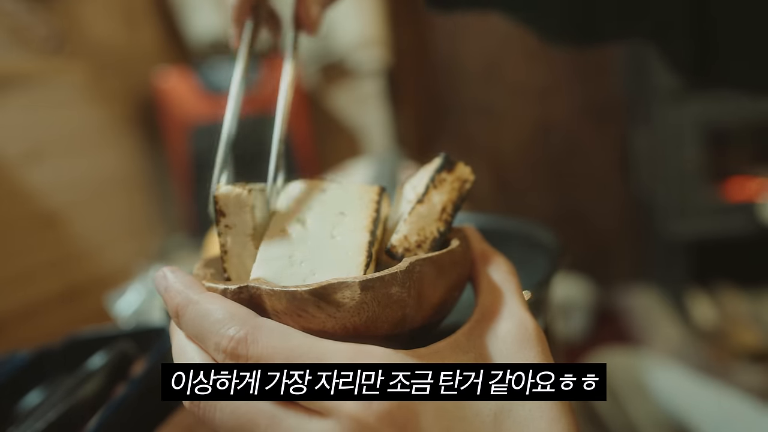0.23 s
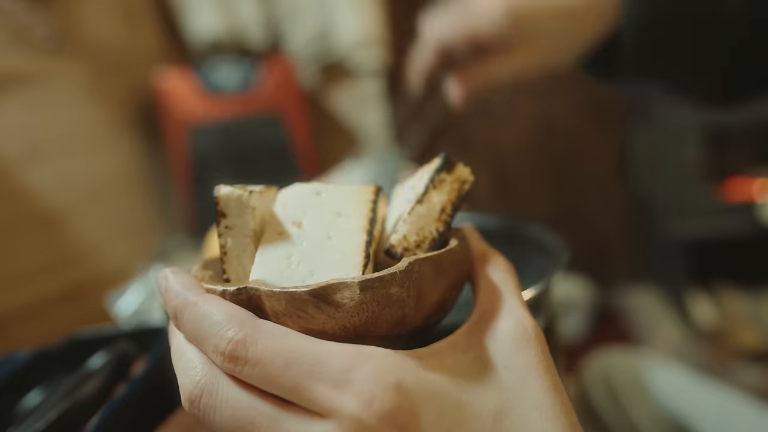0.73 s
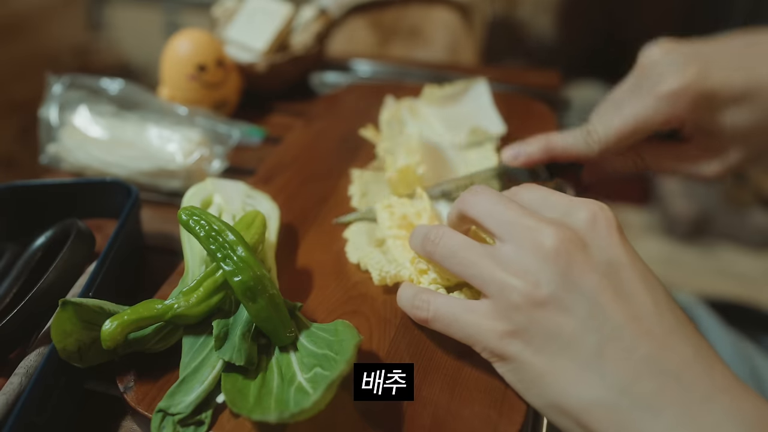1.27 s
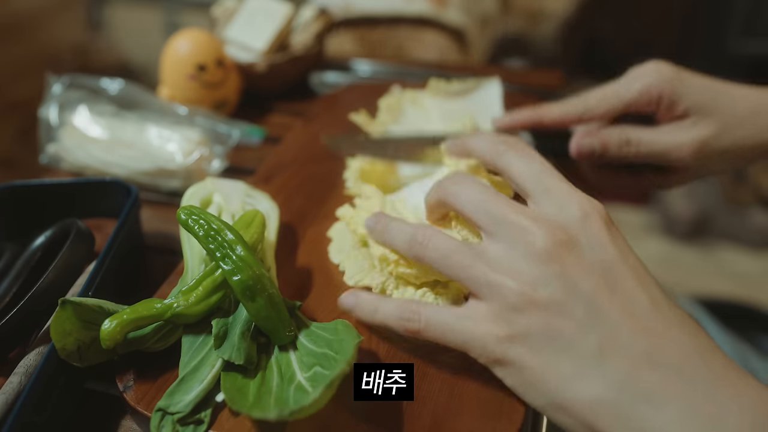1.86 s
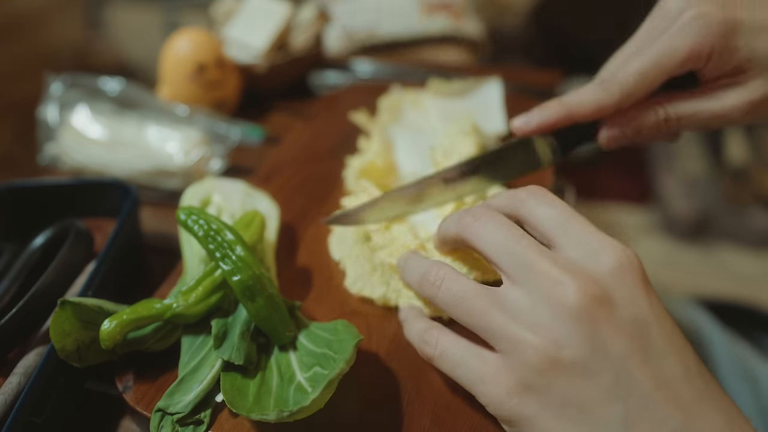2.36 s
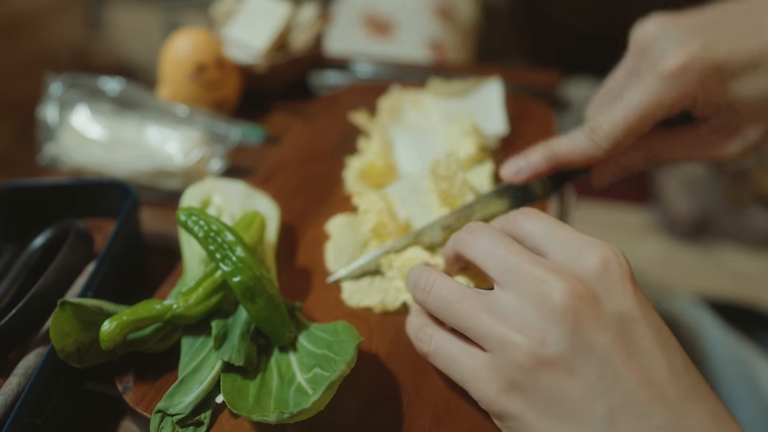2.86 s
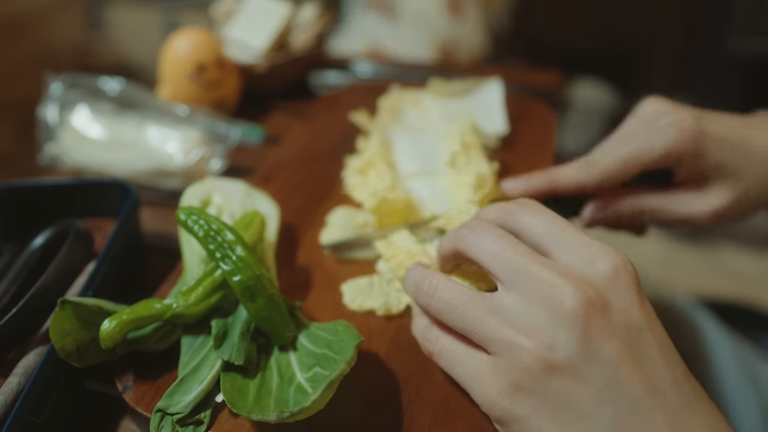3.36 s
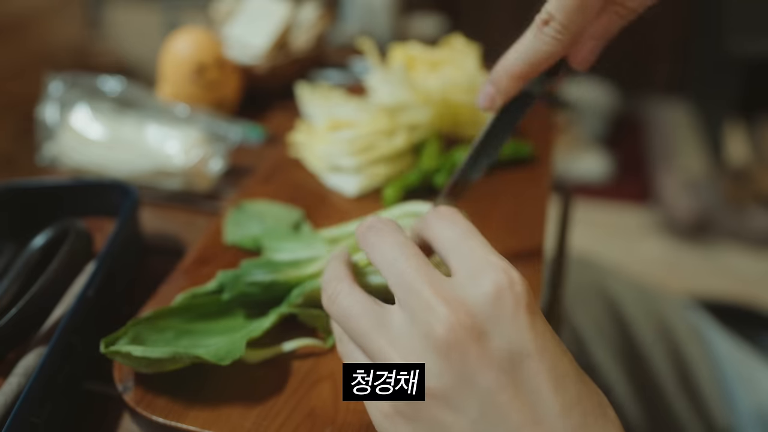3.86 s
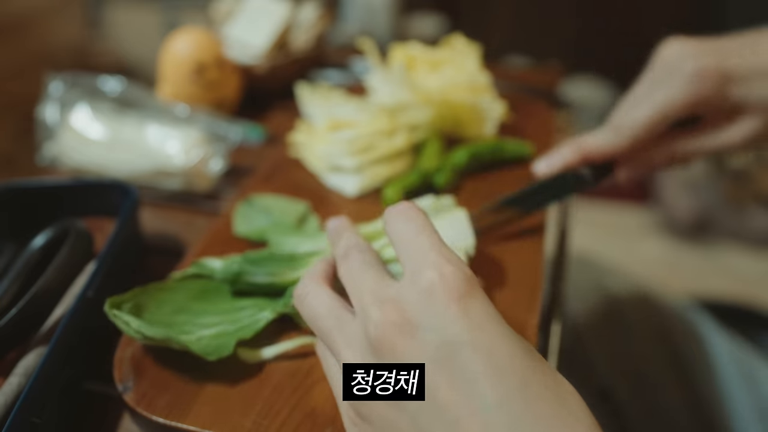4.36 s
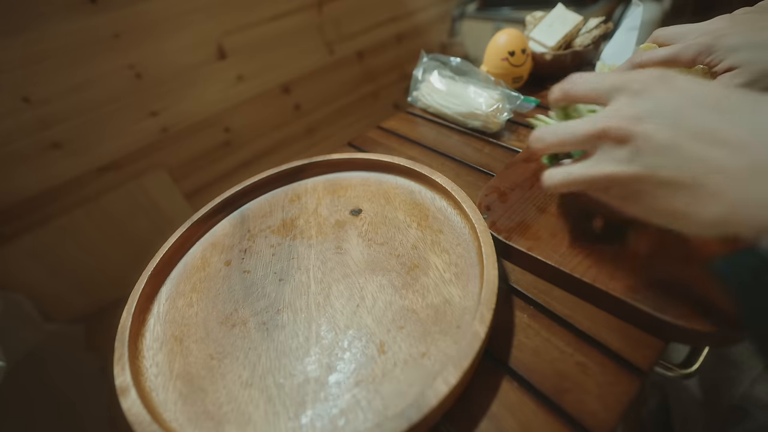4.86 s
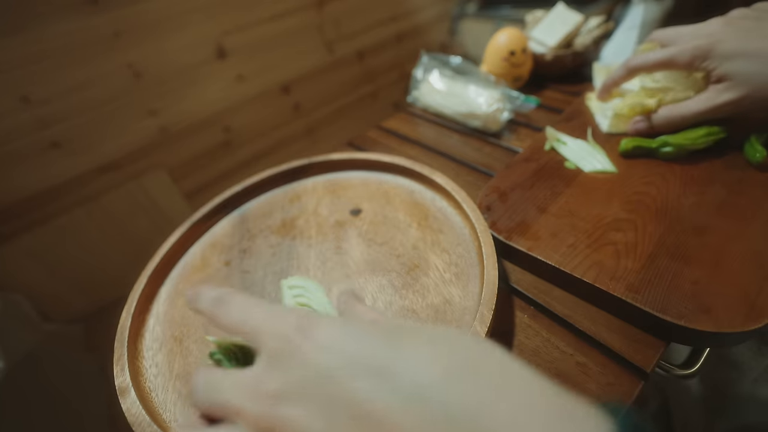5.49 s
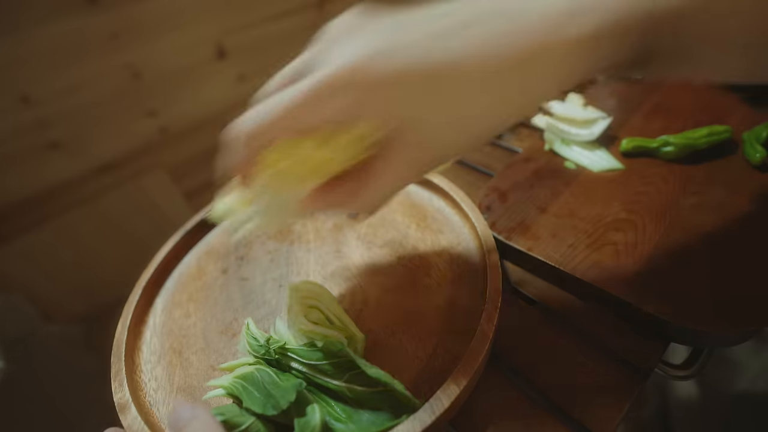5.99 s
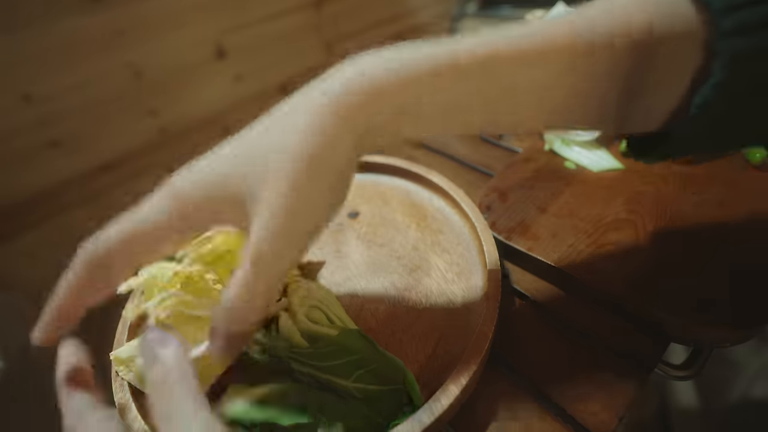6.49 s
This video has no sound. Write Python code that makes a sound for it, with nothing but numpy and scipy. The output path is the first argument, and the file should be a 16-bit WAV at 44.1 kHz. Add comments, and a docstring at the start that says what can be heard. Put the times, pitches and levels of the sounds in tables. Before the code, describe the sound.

Close up in a small wooden room, tongs tick and scrape lightly over low stove rumble and hiss. A knife then crunches through cabbage in sharp crackling strokes, with snapping ribs, board knocks and a brief blade ring. After a quiet rustling pause come more cuts, through cabbage and wet green stalks. Finally, leaves are softly laid on a wooden plate with two clear hollow taps.

```python
"""First tongs tick over a faint hiss and the rumble of a stove, close to one microphone in a small wooden room.
Then a knife slices crisp cabbage and greens: leaf cells burst in a dense crackle of noise puffs, ribs snap
as resonant noise bursts, board and blade ring in decaying modes, the wood hums and the table shakes.
The blade sings as its edge drags on the board. Last, hands lay the leaves on a wooden plate that rings when tapped."""
import sys
import numpy as np
from scipy import signal
from scipy.fft import rfft, irfft, next_fast_len
from scipy.io import wavfile
from scipy.ndimage import uniform_filter1d, map_coordinates

SR = 44100
rng = np.random.default_rng(int(sys.argv[2]) if len(sys.argv) > 2 else 0)


def pcm_store(signal):
    """Save signal as 16-bit PCM."""
    levels = np.round(np.clip(np.atleast_2d(signal), -1, 1) * 32767)
    wavfile.write(sys.argv[1], SR, levels.astype(np.int16).T)


def linear_from_db(decibels):
    """Turn decibels (scalar or array-like) into linear amplitude factors; 0 gives 1."""
    return 10 ** (np.asarray(decibels, float) / 20)


N = 296784
SLICING_S, PLATING_S = 0.89, 4.55  # slicing starts; the hum passes from board to plate


def unit(x):
    """Scale to rms 1."""
    return x / np.sqrt(np.mean(x ** 2) + 1e-20)


def steady(x):
    """Even out the level over a tenth of a second."""
    return x / np.sqrt(np.abs(uniform_filter1d(x ** 2, SR // 10)) + 1e-20)


def along(points, hz):
    """Interpolate (Hz, value) points on a log frequency axis."""
    f, v = np.transpose(points)
    return np.interp(np.log(hz + 1), np.log(f + 1), v)


def filtered(x, response):
    """Multiply the spectrum of x by a complex response of frequency."""
    m = next_fast_len(x.shape[-1] + SR // 4)
    spectrum = rfft(x, m) * response(np.fft.rfftfreq(m, 1 / SR))
    return irfft(spectrum, m)[..., :x.shape[-1]]


def noise_shaped(points):
    """Noise of rms 1 with a spectrum through (Hz, dB) points."""
    return unit(filtered(rng.standard_normal(N), lambda hz: linear_from_db(along(points, hz))))


def wobble(rate):
    """A smooth random curve, rate knots a second."""
    knots = rng.standard_normal(int(N * rate / SR) + 4)
    return map_coordinates(knots, [np.arange(N) * rate / SR])


def bursts(rate, spread_db):
    """Random instants, rate a second, with a few large and many small sizes."""
    draw = rng.random((2, N))
    size_db = np.minimum(-spread_db * np.log(draw[1] + 1e-9), 12)
    return (draw[0] < rate / SR) * linear_from_db(size_db)


def fall(t60, attack):
    """A fast rise and an exponential decay, a third of a second long."""
    t = np.arange(SR // 3) / SR
    return linear_from_db(-60 * t / t60) * (1 - np.exp(-t / attack))


def ring(modes, attack, rough=0):
    """Decaying modes, peak 1: pitch and strengths vary a little at random, a random phase drift roughens the tone."""
    t = np.arange(SR // 3) / SR
    shift = 1 + 0.015 * rng.normal()
    out = np.zeros(len(t))
    for hz, db, t60 in modes:
        drift = rough * np.sqrt(hz / SR) * np.cumsum(rng.standard_normal(len(t)))
        strength = linear_from_db(db + 1.5 * rng.normal())
        out += strength * fall(t60, attack) * np.sin(2 * np.pi * shift * hz * t + drift)
    return out / np.abs(out).max()


def add(track, s, sound):
    """Mix a sound in at time s."""
    part = track[round(s * SR):][:len(sound)]
    part += sound[:len(part)]


def swells(s, db, rise_s, fall_s, bend):
    """Power of each event on a millisecond grid: 25 dB under its peak after rise_s before or fall_s past it."""
    s, db, rise_s, fall_s = (np.reshape(v, (-1, 1)) for v in (s, db, rise_s, fall_s))
    late = np.arange(0, N / SR + 0.002, 0.001) - s
    gone = np.abs(late) / np.where(late < 0, rise_s, fall_s)
    return linear_from_db(2 * (db - np.minimum(25 * gone ** bend, 200)))


def per_sample(x):
    """From the millisecond grid to samples."""
    return np.interp(np.arange(N) / SR * 1000, np.arange(len(x)), x)


# Rumble spectra, near the stove and of the shaken table. Each row: frequency in Hz, relative density in dB.
STOVE_SPECTRUM = [(15, -2.5), (59, 1.5), (124, -6.5), (160, -17), (300, -33), (600, -40)]
TABLE_SPECTRUM = [(15, -2.5), (30, -6), (50, 5), (90, -6.5), (140, -13.5), (300, -19), (600, -75)]
# Pushes that shake the table. Each row: peak time in seconds, level in dB.
PUSHES = [(1.31, -36.5), (1.55, -45), (2.12, -50.5), (2.784, -44.5), (3.04, -36.5), (3.4, -46.5),
          (3.851, -33), (4.2, -44), (4.85, -49), (5.507, -35)]
# Low thumps and sways of the table. Each row: start in seconds, level in dB, frequency in Hz,
# t60 in seconds before the fade.
THUMPS = [(0.04, -29.5, 127, 0.13), (2.078, -19, 119, 0.042), (3.343, -23, 112, 0.073),
          (3.804, -20, 37.5, 0.83), (4.189, -24.5, 41.7, 0.4), (5.496, -25, 65.3, 0.34)]


def table_rumble():
    """Low noise through table and microphone stand swells with pushes; thumps and sways add decaying low sines."""
    stove_db, still_db = -44.5, -59
    pushed = swells(*np.transpose(PUSHES), rise_s=0.25, fall_s=0.33, bend=1.0).sum(axis=0)
    shaken = np.sqrt(per_sample(pushed) + linear_from_db(2 * still_db)) * noise_shaped(TABLE_SPECTRUM)
    stove = linear_from_db(stove_db + 0.24 * wobble(rate=4.8)) * noise_shaped(STOVE_SPECTRUM)
    out = np.where(np.arange(N) < SLICING_S * SR, stove, shaken)
    t = np.arange(SR // 3) / SR
    fade = np.cos(1.5 * np.pi * t)  # zero at a third of a second
    for s, db, hz, t60 in THUMPS:
        add(out, s, linear_from_db(db) * fall(t60, attack=0.01) * fade * np.sin(2 * np.pi * hz * t))
    return out


# Hiss spectrum. Each row: frequency in Hz, relative density in dB.
HISS_SPECTRUM = [(88, -12), (150, -6.5), (270, -12), (376, -14.5), (979, -16), (2100, -34), (6390, -33.5),
                 (16000, -29)]


def air():
    """Steady shaped noise of the room, louder near the stove before the slicing."""
    stove_db, room_db = -53.5, -67.5
    level_db = np.where(np.arange(N) < SLICING_S * SR, stove_db, room_db)
    return linear_from_db(level_db) * noise_shaped(HISS_SPECTRUM)


# Modes of the tongs. Each row: frequency in Hz, relative level in dB, t60 in seconds.
TONGS = [(867, -3, .07), (2200, -3, .12), (2700, -8, .18), (3015, -6, .16), (4250, -3, .17)]
# Ticks, scrapes and knocks of tongs, bowl and blade. Each row: start in seconds, peak in dB, centre in Hz,
# t60 in seconds.
TICKS = [(0.041, -28.5, 2100, 0.17), (0.172, -31, 6650, 0.014), (0.22, -35, 3500, 0.16),
         (0.248, -32, 13500, .01), (0.358, -29, 383, 0.029), (.36, -41, 1530, 0.13),
         (0.513, -45, 4170, 0.098), (0.724, -46.5, 2460, 0.18), (1.785, -38, 880, 0.16),
         (2.063, -21, 1300, 0.18), (2.081, -17, 1550, 0.0073), (3.37, -37.5, 786, 0.084),
         (3.386, -29.5, 526, 0.045), (6.612, -42, 942, 0.23)]


def ticks():
    """Sharp noise bursts, each in one broad resonance; early ones between 1 and 5 kHz also ring the tongs."""
    out = np.zeros(N)
    for s, db, centre_hz, t60 in TICKS:
        envelope = fall(t60, attack=0.0005) + 1.14 * fall(0.0034, attack=0.00018)
        burst = envelope * rng.standard_normal(SR // 3)
        if s < SLICING_S and 1000 < centre_hz < 5000:
            burst += 1.2 * ring(TONGS, attack=0.0003, rough=0.5)
        width_hz = 1.46 * centre_hz

        def resonance(f):
            return (1j * f * width_hz / (centre_hz ** 2 - f * f + 1j * f * width_hz)) ** 2

        burst = filtered(burst, resonance)
        add(out, s, linear_from_db(db) * burst / np.abs(burst).max())
    return out


# Knife strokes through the leaves. Each row: peak time in seconds, level in dB, rise in seconds,
# fall in seconds, treble share of the power in dB.
CUTS = [(0.949, -31.5, 0.062, 0.11, -4.5), (1.012, -25.5, 0.019, 0.03, -2), (1.293, -23.5, 0.27, 0.22, -5),
        (1.552, -40, 0.059, 0.34, -11.5), (2.734, -31.5, 0.062, 0.076, -2.5), (2.972, -20, 0.15, 0.14, -5),
        (3.641, -40, 0.19, 0.085, -1), (3.78, -20.5, 0.058, 0.032, -2), (4.002, -30.5, 0.057, 0.41, 1.5),
        (4.099, -33.5, 0.3, 0.33, -6.5), (4.321, -29.5, 0.031, 0.0088, -1)]
# Fingers gripping and shifting leaves. Each row: peak time in seconds, level in dB, length in seconds,
# treble share of the power in dB.
GRIPS = [(1.795, -43, 0.52, -5.5), (2.193, -48, 0.096, -18), (2.314, -53, 0.11, -7), (2.36, -51, 0.14, -6),
         (2.418, -52, 0.13, -15), (2.508, -49.5, 0.098, -4), (2.61, -47.5, 0.71, -1),
         (3.178, -47.5, 0.46, -5), (3.31, -43, 0.21, -1), (3.374, -40.5, 0.24, -3.5),
         (3.46, -37.5, 0.046, -13), (4.47, -42.5, 0.42, -1.5), (4.644, -48.5, 0.26, -17),
         (4.771, -54, 0.6, -5.5), (5.046, -45, 0.19, -1.5), (5.485, -46, 0.81, -6), (5.663, -47, 0.27, -3),
         (5.797, -37, 0.086, -5), (6.047, -51, 0.37, -2.5), (6.225, -38.5, 0.058, -7),
         (6.294, -43.5, 0.67, -5.5), (6.593, -54, 0.2, -7), (6.72, -45, 0.069, -2.5)]


def handling():
    """Effort on the leaves in dB and its treble share in dB: cuts and grips add up in power."""
    rest_db, rest_bright_db = -69, -8
    s, db, length_s, grip_bright_db = np.transpose(GRIPS)
    *cut, cut_bright_db = np.transpose(CUTS)
    grips = swells(s, db, 0.35 * length_s, 0.65 * length_s, bend=1.22)
    power = np.vstack([swells(*cut, bend=1.9), grips])
    rest = linear_from_db(2 * rest_db)
    total = power.sum(axis=0) + rest
    bright_db = (np.append(cut_bright_db, grip_bright_db) @ power + rest_bright_db * rest) / total
    return per_sample(10 * np.log10(total)), per_sample(bright_db)


# Spectrum of breaking leaf. Each row: frequency in Hz, relative density in dB.
LEAF_SPECTRUM = [(110, -37), (290, -1), (500, -6.5), (761, -7), (1440, -7), (2070, 1.5), (3060, 1.5),
                 (4530, 2.5), (13800, -1), (16000, -5.5)]
# Centres of the colours of the crackle. One column: frequency in Hz.
COLOURS_HZ = [1200, 2200, 3800, 6000, 9000, 13500]


def colour(k):
    """Response of the leaf spectrum around the k-th colour; the parts add up in power."""
    def response(hz):
        hat = np.interp(np.log(hz + 1), np.log(COLOURS_HZ), np.arange(len(COLOURS_HZ)) == k)
        return linear_from_db(along(LEAF_SPECTRUM, hz)) * np.sqrt(hat)
    return response


def tint(bright_db, usual_db):
    """Gain of each colour for a treble share of the power; colours above 7 kHz are the treble."""
    share, usual = np.clip(linear_from_db(2 * bright_db), 0.01, 0.93), linear_from_db(2 * usual_db)
    bright, dull = np.sqrt(share / usual), np.sqrt((1 - share) / (1 - usual))
    return [bright if hz > 7000 else dull for hz in COLOURS_HZ]


def leaves():
    """Bursting cells: each break is a millisecond puff of noise with its own colour, over a wet rustle."""
    crackle_db, bright_db = handling()
    effort = np.clip((crackle_db + 63.5) / 35, 0, 1)
    time = np.arange(N) / SR
    juicy = 0.4 * (time > 3.9) * (time < 4.27)  # thick wet stalks crush into a dense crunch
    cells = bursts(rate=60 + 1100 * effort + 2500 * juicy, spread_db=5.5)
    clumps = linear_from_db(4.5 * (1 - juicy) * wobble(rate=90))  # fibres tear in short runs
    puff = fall(0.0035, attack=0.0001)[:900]
    density = linear_from_db(2 * along(LEAF_SPECTRUM, np.linspace(1500, 16000, 400)))
    whole = 0.81 * np.sqrt(np.mean(density))
    out = np.zeros(N)
    for k, loose in enumerate(tint(bright_db, usual_db=-4.0)):
        tinted = cells * linear_from_db(6 * rng.standard_normal(N))  # each cell favours other colours
        # leaf slides on leaf, patchy in each colour
        patches = linear_from_db(2.5 * wobble(rate=9) + 3 * wobble(rate=40))
        rustle = (1.15 - 0.75 * effort + juicy) * patches
        crackle = steady(signal.fftconvolve(tinted, puff)[:N] + 1e-3)
        bed = steady((crackle + rustle) * clumps) * np.sqrt(patches)
        body = linear_from_db(4.5 * effort) if k == 0 else 1  # hard cuts wake more of the lowest colour
        envelope = (time > SLICING_S) * body * loose * linear_from_db(crackle_db) * bed
        out += filtered(envelope * rng.standard_normal(N), colour(k)) / whole
    return out


# Leaf ribs breaking. Each row: start in seconds, peak in dB, centre in Hz.
SNAPS = [(0.9013, -20.5, 2190), (0.9449, -5, 9750), (1.0091, -13, 4120), (1.1323, -7, 4840),
         (1.1703, -13, 5070), (1.2022, -14, 2100), (1.2172, -7.5, 2360), (1.2592, -8, 3930),
         (1.28, -14, 4110), (1.3033, -6, 4370), (1.317, -9, 3900), (1.3488, -11, 2360),
         (1.3738, -6.5, 2730), (1.4531, -14, 4150), (1.5343, -22.5, 6300), (1.5395, -19, 6560),
         (1.5465, -20.5, 5790), (1.5515, -18, 5800), (1.559, -17, 5300), (1.5684, -19.5, 1750),
         (1.6179, -24, 4340), (1.8368, -26.5, 4340), (2.155, -32.5, 2060), (2.5903, -24.5, 2440),
         (2.7277, -3.5, 2270), (2.8429, -12, 1970), (2.8604, -12, 4400), (2.8764, -9, 2000),
         (2.8987, -10, 7400), (2.918, -9.5, 2070), (2.9411, -21, 2470), (2.9574, -3, 2070),
         (2.9702, -10, 4830), (2.9921, -5.5, 2100), (3.0169, -7.5, 2180), (3.1392, -28, 4950),
         (3.262, -23.5, 4600), (3.456, -23, 2780), (3.6116, -20.5, 5600), (3.6465, -18.5, 3830),
         (3.7224, -16.5, 5450), (3.7537, -12, 3900), (3.8787, -28.5, 7500), (3.9647, -14.5, 4200),
         (3.9833, -13, 4230), (4.134, -5.5, 4350), (4.1441, -7, 2120), (4.1864, -12, 2130),
         (4.2869, -12.5, 5200), (4.2934, -17.5, 4450), (4.3328, -19, 6400), (4.642, -30.5, 4090),
         (4.6605, -27, 1730), (4.6784, -28.5, 1450), (4.6971, -24, 4100), (4.7658, -30, 1520),
         (4.794, -33.5, 2530), (5.0692, -29.5, 8300), (5.096, -34.5, 3170), (5.1204, -26.5, 10100),
         (5.4273, -21.5, 5840), (5.7717, -19, 6400), (5.7855, -16.5, 7200), (6.2008, -31.5, 3850),
         (6.2907, -23.5, 3420), (6.351, -27.5, 4200), (6.7116, -33, 2930)]


def ribs():
    """Each rib breaks with milliseconds of noise ringing around its own pitch over a broader crack."""
    s, db, centre_hz = (c[:, None] for c in np.transpose(SNAPS))
    size = 2048
    hz = np.fft.rfftfreq(size, 1 / SR)
    burst = fall(0.011, attack=0.0004)[:size // 2] * rng.standard_normal((len(s), size // 2))
    width_hz = 0.5 * centre_hz
    peak = 1j * hz * width_hz / (centre_hz ** 2 - hz * hz + 1j * hz * width_hz)
    crack = linear_from_db(-3 + along(LEAF_SPECTRUM, hz)) * np.sqrt(width_hz / 8000)
    sound = irfft(rfft(burst, size) * (peak + crack), size)[:, :size // 2]
    sound = linear_from_db(db) * sound / np.abs(sound).max(axis=1, keepdims=True)
    out = np.zeros(N)
    for at, snap in zip(s[:, 0], sound):
        add(out, at, snap)
    return out


# Modes of the board, then of the blade. Each row: frequency in Hz, relative level in dB, t60 in seconds.
BOARD = [(226, 0, .1), (380, -8, .04), (538, -5, .05), (840, -14, .04), (1070, -14, .04), (1550, -15, .03)]
BLADE = [(2043, 16, 0.015), (2108, 18, 0.066), (2650, -13, 0.045), (5200, -15, 0.014)]
# Knife and leaf stalks meeting the board. Each row: start in seconds, peak of the lowest board mode in dB,
# upper board modes in dB over it, blade ring in dB over it.
CHOPS = [(0.944, -24.5, -38, 1), (0.999, -29.5, -4, -8), (1.029, -32, 2.5, -28), (1.175, -32, 8, 3),
         (1.217, -26, -35, -2), (2.726, -20.5, -2.5, -1), (2.858, -29.5, -1, 1.5), (2.959, -37, 6, 19),
         (3.576, -36, -35, -30), (3.611, -23, -18, -48), (3.655, -25.5, -18.5, -32),
         (3.723, -30, -33.5, -24), (3.761, -23, -28, -30), (3.788, -19, -1, -1), (3.975, -35.5, -9.5, -16),
         (4.068, -35.5, -17.5, -30), (4.135, -27, 1, 5.5), (4.144, -22.5, 14, 9), (4.297, -33, -17, -26)]


def chops():
    """Blows ring the modes of board and blade; a hard edge wakes the upper ones."""
    out = np.zeros(N)
    for s, db, hard_db, blade_db in CHOPS:
        add(out, s, linear_from_db(db) * ring(BOARD[:1], attack=0.002, rough=0.45))
        add(out, s, linear_from_db(db + hard_db) * ring(BOARD[1:], attack=0.001, rough=0.5))
        add(out, s, linear_from_db(db + blade_db) * ring(BLADE, attack=0.00057, rough=0.24))
    return out


def wood_hum_db():
    """The wood hums louder as leaves are worked harder, and the plate rattles on after each tap."""
    hardest_db, db_per_db, smear_s = -40, 1.23, 0.045
    worked = uniform_filter1d(linear_from_db(2 * handling()[0]), round(smear_s * SR))
    hum = linear_from_db(2 * hardest_db) * np.abs(worked / worked.max()) ** db_per_db
    s, db, _ = np.transpose(TAPS)
    rattle = swells(s, db - 9, rise_s=0.0015, fall_s=0.115, bend=0.79).sum(axis=0)
    return 10 * np.log10(hum + per_sample(rattle))


def wood_hum():
    """Small random jolts keep the wood under the leaves ringing: first the board, then the plate."""
    jolts = bursts(rate=180, spread_db=9.0) * rng.standard_normal(N)
    damped = fall(0.04, attack=0.001)  # leaves and hands deaden the ring
    hums = []
    for body in (BOARD, PLATE):
        sound = signal.fftconvolve(jolts, damped * ring(body, attack=0.0024))[:N]
        hums.append(steady(sound))
    on_board = np.arange(N) < PLATING_S * SR
    return linear_from_db(wood_hum_db()) * np.where(on_board, *hums)


# The blade's edge drags on the board. Each row: peak time in seconds, level in dB, rise in seconds,
# fall in seconds.
DRAGS = [(2.97, -26, 0.036, 0.11), (4.21, -29, 0.067, 0.079)]


def blade_song():
    """Friction noise kept alive in the blade's modes."""
    song = signal.fftconvolve(rng.standard_normal(N), ring(BLADE, attack=0.0004))[:N]
    power = swells(*np.transpose(DRAGS), bend=0.74).sum(axis=0)
    return np.sqrt(per_sample(power)) * steady(song)


# Modes of the plate. Each row: frequency in Hz, relative level in dB, t60 in seconds.
PLATE = [(190, 2, .09), (340, 0, .07), (580, 1.5, .095), (690, -2, .045), (900, -9, .05), (1230, -7, .04),
         (1500, -10, .04), (2000, -16, .025)]
# Leaves and fingers meeting the plate. Each row: start in seconds, reference level in dB,
# modes from the third up in dB over it.
TAPS = [(4.527, -36.5, -23), (4.558, -41, -26), (4.767, -38, -20), (4.843, -31.5, -2), (5.059, -41.5, -15),
        (5.365, -46.5, 5), (5.454, -21, 3.5), (5.463, -40, 14.5), (5.503, -20.5, 2), (5.689, -42.5, -21),
        (5.776, -36, -31), (6.271, -51, 7.5), (6.495, -46.5, -5)]


def taps():
    """Taps ring the plate's modes; only heavy ones bend the whole plate in its lowest."""
    out = np.zeros(N)
    for s, db, hard_db in TAPS:
        add(out, s, linear_from_db(db + 0.68 * (db + 19)) * ring(PLATE[:1], attack=0.0017, rough=0.19))
        add(out, s, linear_from_db(db - 6.5) * ring(PLATE[1:2], attack=0.006, rough=0.15))
        add(out, s, linear_from_db(db + hard_db) * ring(PLATE[2:], attack=0.002, rough=0.2))
    return out


def room(x):
    """A short wooden tail of decaying noise, dying faster in the treble, 130 samples late."""
    hz, t, z = signal.stft(rng.standard_normal(SR // 3), SR, nperseg=256)
    t60 = along([(300, 0.23), (3000, 0.16), (12000, 0.014)], hz)[:, None]
    tail = signal.istft(z * linear_from_db(-60 * t / t60), SR, nperseg=256)[1]
    return signal.fftconvolve(np.pad(x, (130, 0)), tail / np.linalg.norm(tail))[:N]


def scene():
    """All close sources, the room's answer, rumble and hiss."""
    near = ticks() + leaves() + ribs() + chops() + wood_hum() + blade_song() + taps()
    wet = linear_from_db(-13) * room(near)
    return (near + wet + table_rumble() + air())[None]


def top_cut(x):
    """Nothing passes above the cut-off."""
    return signal.sosfilt(signal.butter(12, 16990, fs=SR, output="sos"), x)


def record(dry):
    """The recorder rounds off its loudest peaks and limits the band."""
    rounded = dry / (1 + np.abs(dry / 0.8) ** 4) ** (1 / 4)
    limited = filtered(rounded, lambda hz: np.interp(hz, [15900, 16150], [1, 0.03]))
    return top_cut(limited)


dry = scene()
out = record(dry)
pcm_store(out)
```